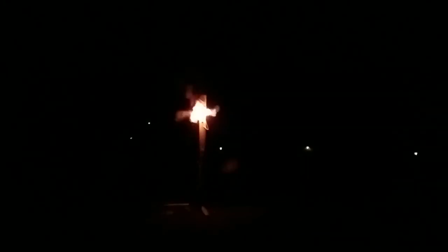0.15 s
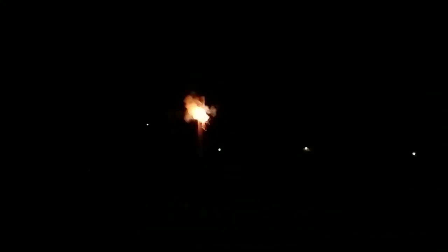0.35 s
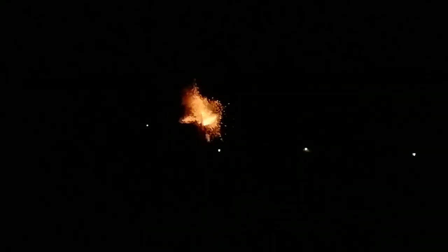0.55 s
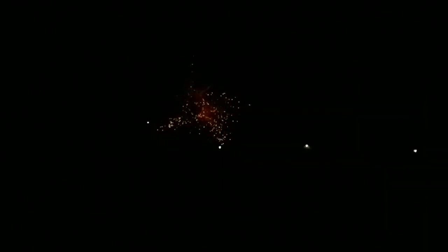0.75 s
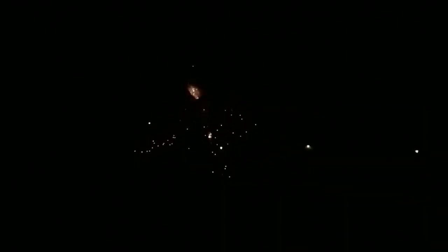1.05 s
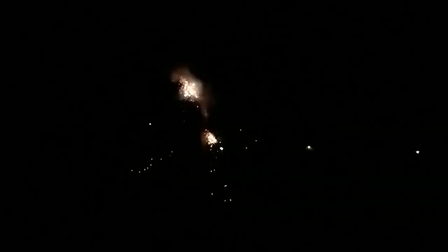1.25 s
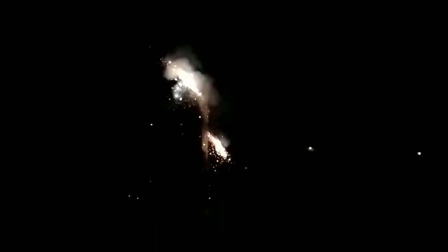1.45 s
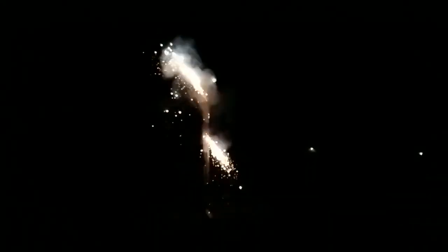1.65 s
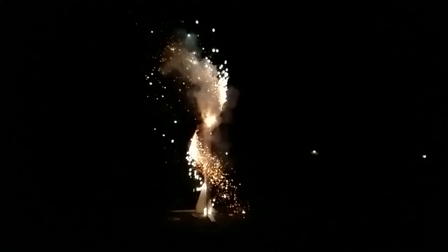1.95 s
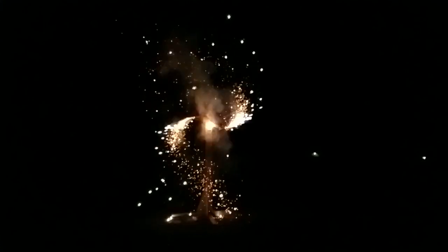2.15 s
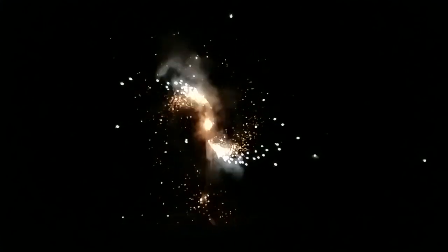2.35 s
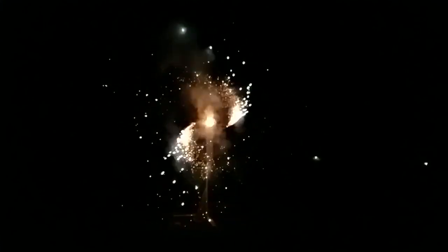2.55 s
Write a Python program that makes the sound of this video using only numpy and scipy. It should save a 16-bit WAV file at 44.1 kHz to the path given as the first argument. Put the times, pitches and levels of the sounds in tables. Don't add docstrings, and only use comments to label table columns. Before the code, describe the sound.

A firework wheel some metres away on an open lawn. Its fuse spits at once and sputters weakly, then flares at 0.5 s with a hissing burst and sharp pop at 0.54 s, dying by 0.7 s. Wind thumps the phone microphone around 0.9-1.3 s. Jet hiss grows from 1.2 s, peaks around 1.75-2 s, then rushes on slightly softer, grainy and shifting in colour as it spins.

```python
import sys
import numpy as np
from scipy import signal
from scipy.fft import rfft, irfft
from scipy.io import wavfile
from scipy.ndimage import uniform_filter1d, map_coordinates

SR = 44100
rng = np.random.default_rng(int(sys.argv[2]) if len(sys.argv) > 2 else 0)


def invert_db(level):
    return 10 ** (np.asarray(level, dtype=float) / 20)


def dump_mix(stems):
    frames = np.atleast_2d(stems).T
    limited = np.clip(frames, -1, 1)
    pcm = np.round(limited * 32767).astype(np.int16)
    wavfile.write(sys.argv[1], SR, pcm)


N = 119070
T = np.arange(N) / SR
HZ = np.arange(N // 2 + 1) * SR / N + 1

# (time [s], level [dB], nozzle ring [0-1], low roar share [dB],
# first jet over second [dB], casing ring [0-1])
THRUST = [(1.0, -63.5, 0.7, -2, 7, 0), (1.3, -42, 0.1, -12.5, 3.5, 0.02), (1.55, -32.5, 0.36, -14, -3, 0),
          (1.73, -22.5, 0.54, -15.5, -3.5, 0.1), (1.8, -23.5, 0.27, -10.5, 0, 0),
          (1.87, -24, 0.03, -6.5, 0.5, 0.02), (1.96, -22.5, 0, -6.5, -1.5, 0.28),
          (2.07, -24.5, 0.03, -9, -4.5, 0.1), (2.2, -27.5, 0.15, -9, -6.5, 0),
          (2.33, -29, 0.01, -8.5, 1, 0.05), (2.43, -27, 0.17, -7, 6, 0), (2.56, -28, 0, -9, 2, 0.04),
          (2.7, -29, 0, -7.5, -3.5, 0)]
# (time [s], angle from upright [rad])
WHEEL_ANGLE = [
    (1.7, 0),
    (1.9, .5),
    (2.05, 1.0),
    (2.2, 1.65),
    (2.43, 3.14),
    (2.7, 5.3),
]
# (frequency [Hz], level [dB])
JET_HISS = [(200, -14), (600, -9), (1330, -1), (1600, -5.5), (2750, 0.5), (5200, -4), (9500, -11),
            (14000, -11)]
# (frequency [Hz], level [dB])
NOZZLE_TONE = [(1500, 1), (2800, -5.5), (4000, -1), (5200, 1.5), (7800, -6), (11000, -16)]
# (frequency [Hz], level [dB])
ROAR = [(150, -5.5), (350, -3.5), (600, 6.5), (1000, -4), (2200, -4.5), (5000, -62)]
# (time [s], level [dB], low roar share [dB])
FUSE = [
    (0, -46.5, -5),
    (.018, -31.5, -6),
    (.07, -36.5, -3.5),
    (.25, -40.5, 0),
    (.36, -43, 4.5),
    (.42, -36, -4),
    (.49, -30.5, -8),
]
# (time [s], level [dB], low roar share [dB])
FLARE = [
    (.498, -27, -3),
    (.515, -20.5, -4),
    (.536, -19.5, -6),
    (.548, -21.5, -12.5),
    (.58, -22, -2),
    (.605, -26, -18),
    (.68, -44.5, -3),
    (.86, -56.5, 0),
    (1.1, -75, 0),
]
# (frequency [Hz], level [dB])
FUSE_HISS = [(150, -18), (250, -23), (430, -3.5), (1050, -13), (1900, 1), (3900, -7.5), (9600, -13.5),
             (14000, -13)]
# (time [s], peak level [dB], width [ms])
POPS = [
    (.4985, -15, .3),
    (.5389, 0, .28),
    (.5415, -8.5, .25),
    (.5431, -9, .4),
    (.5485, -18, .15),
    (.5765, -17, .35),
    (.582, -18, .2),
]
# (frequency [Hz], level [dB])
NIGHT = [(30, -27), (100, -7.5), (600, -7), (1300, -12.5), (3000, -18.5), (8000, -20), (14000, -30)]
# (frequency [Hz], level [dB])
LEFT_LEAN = [(60, -2), (110, -7), (200, 2.5), (380, -1), (700, 1), (1290, -1.5), (2380, -2.0), (4400, 0.5),
             (8120, 7), (15000, 6)]
# (frequency [Hz], phase [rad])
LEFT_AHEAD = [(100, .1), (1400, .3), (3800, 1.4), (5100, .5), (6500, 1.7), (7300, .4), (11000, 1.9),
              (13300, .4)]
# (frequency [Hz], level [dB])
UNLIKE = [(60, -13), (400, -12), (1400, -8.5), (3000, -6.5), (4400, -2), (7800, -5), (10500, -2),
          (13500, -5.5)]
# (time [s], level [dB])
GUST = [(0, -66), (.44, -61), (.56, -55), (.68, -70), (.8, -63), (.9, -43), (1.04, -52), (1.3, -45),
        (1.45, -46), (1.6, -48.5), (1.8, -40), (1.93, -53), (2.05, -42), (2.2, -47), (2.33, -40.5),
        (2.5, -49.5), (2.7, -45)]
# (frequency [Hz], level [dB])
WIND = [(12, -47), (20, -44), (65, -3.5), (114, -1.5), (296, -14.5), (367, -33), (500, -21), (650, -67),
        (1100, -120)]
# (time [s], peak level [dB], frequency [Hz], sign)
BUFFETS = [(0.851, -40, 79.5, 1), (0.89, -26, 92, 1), (0.929, -33.5, 89, -1), (1.065, -40, 82, -1),
           (1.113, -27.5, 107, -1), (1.182, -40, 100, 1), (1.222, -26, 88, 1), (1.265, -30.5, 84.5, 1),
           (1.829, -33, 120, 1), (2.24, -32, 146, 1)]
# (frequency [Hz], width [Hz], level [dB])
BODY = [(4164, 400, -3.5), (6840, 1540, -2.5), (7610, 810, 3.5), (9850, 1300, -1.5), (13930, 3600, 6)]


def shape(points):
    p = np.array(points, float)
    return np.interp(np.log(HZ), np.log(p[:, 0]), p[:, 1])


def unit(x):
    return x / np.sqrt(np.mean(x ** 2))


def colour(x, points):
    return irfft(rfft(x) * invert_db(shape(points)), N)


def curve(table, col=1):
    p = np.array(table, float)
    return np.interp(T, p[:, 0], p[:, col])


def walk(rate):
    hold = int(SR / rate)
    steps = np.repeat(rng.standard_normal(N // 50), hold)[:N]
    quick = uniform_filter1d(uniform_filter1d(steps, hold), hold)
    return unit(quick - uniform_filter1d(quick, 5 * hold))


def late(x, ms):
    return np.array([map_coordinates(c, [(T - ms / 1000) * SR], order=3, mode="mirror") for c in x])


def jets():
    hub_echo_ms, rim_echo_ms, rim_depth_ms, casing_ms = 2.53, 0.42, 0.3, 1.55
    ring = np.clip(curve(THRUST, col=2), 0, 0.95)
    casing = np.clip(curve(THRUST, col=5), 0, 0.95)
    first = 1 / (1 + invert_db(-2 * curve(THRUST, col=4)))
    out = 0
    for offset, share in ((0, first), (np.pi, 1 - first)):
        angle = curve(WHEEL_ANGLE) + offset
        gas = burn(JET_HISS, curve(THRUST, col=3), sputter_db=1.14, patch_db=1.0, spark_db=1.4)
        gas = gas + ring * nozzle(gas) + casing * late(gas, casing_ms)
        gas = gas / np.sqrt(1 + ring ** 2 + casing ** 2)
        gas = late(gas * np.sqrt(share), rim_depth_ms * np.sin(angle))
        out = out + grounded(gas, hub_echo_ms + rim_echo_ms * np.cos(angle))
    build_up = np.clip((T - 0.8) / 0.44, 0, 1)
    return out * invert_db(curve(THRUST) - 1.5) * build_up


def nozzle(gas):
    delay_ms, phase_rad = 0.39, 0.56
    turn = np.exp(1j * (phase_rad - 2 * np.pi * HZ * delay_ms / 1000))
    return irfft(rfft(gas) * turn * invert_db(shape(NOZZLE_TONE)), N)


def burn(hiss_points, roar_db, sputter_db, patch_db, spark_db):
    sparks_per_s, spark_level_db = 340, -13.5
    gas = rng.standard_normal((2, N)) * invert_db(sputter_db * walk(70) + spark_db * walk(500))
    chance = rng.random((2, N))
    spark_size = invert_db(spark_level_db + 20 - 2.5 * np.log(chance[1] + 0.05))
    sparks = (chance[0] < sparks_per_s / SR) * spark_size
    spectrum = rfft(colour(gas + sparks * np.sign(gas), hiss_points))
    hiss = 0
    for hz in 100 * 2 ** np.arange(0, 7.6, 0.5):
        band = np.cos(np.pi * np.clip(np.log2(HZ / hz), -0.5, 0.5)) ** 2
        hiss = hiss + irfft(spectrum * band, N) * invert_db(patch_db * walk(24.88))
    roar = colour(rng.standard_normal((2, N)), ROAR) * invert_db(2.0 * walk(60))
    return unit(hiss) + invert_db(roar_db) * unit(roar)


def grounded(x, ms):
    soft = signal.sosfilt(signal.butter(1, 5000, fs=SR, output="sos"), x)
    return x + invert_db(-4.5) * late(soft, ms)


def fuse():
    burning = FUSE + FLARE
    gas = burn(FUSE_HISS, curve(burning, col=2), sputter_db=1.33, patch_db=0.5, spark_db=1.2)
    return grounded(gas * invert_db(curve(burning) - 4.0) * (T < 1.3), 2.53)


def pops():
    out = 0
    for s, db, ms in POPS:
        u = (T - s) / ms * 1000
        push = 0.65 * np.exp(-(2.2 * (u + 1)) ** 2)
        pull = np.exp(-(1.5 * (u - 1)) ** 2)
        out = out + invert_db(db) * (push - pull)
    return colour(out, [(80, -40), (350, -7.5), (400, -2.5)]) * np.array([[1], [0.1]])


def far_echoes(wheel):
    tail_db, tail_t60_s = -10, 0.23
    tail = unit(rng.standard_normal((2, N))) * invert_db(-60 * T / tail_t60_s) * (T > 0.01)
    tail = tail / np.sqrt(np.sum(tail[0] ** 2))
    return invert_db(tail_db) * irfft(rfft(wheel) * rfft(tail), N)


def night():
    return invert_db(-54.5) * unit(colour(rng.standard_normal((2, N)), NIGHT))


def wind():
    left_db, apart, cycles, snap = -1, 0.26, 0.65, 0.21
    rough = rng.standard_normal((2, N)) * invert_db(1.3 * walk(39.85))
    rumble = unit(colour(rough, WIND)) * invert_db(curve(GUST))
    mid, side = rumble[0], apart * rumble[1]
    for s, db, hz, sign in BUFFETS:
        u = (T - s) * hz
        thump = np.cos(2 * np.pi * u + 0.7)
        edge = snap * np.exp(-(2.0 * u) ** 2) * np.cos(2 * np.pi * 2.9 * u + 0.96)
        mid = mid + np.sign(sign) * invert_db(db) * np.exp(-(u / cycles) ** 2) * (thump + edge)
    return np.array([mid + side, mid - side]) * invert_db(np.array([[left_db], [-left_db]]) / 2)


def scene():
    wheel = fuse() + jets() + pops()
    air = wheel + far_echoes(wheel) + night()
    common = rfft(air[0])
    unlike = rfft(air[1]) * invert_db(shape(UNLIKE))
    lean = invert_db(shape(LEFT_LEAN) / 2) * np.exp(0.5j * shape(LEFT_AHEAD))
    ports = np.array([(common + unlike) * lean, (common - unlike) / lean])
    return irfft(ports, N) + wind()


def roll_off(x):
    return signal.sosfilt(signal.butter(12, 15760, fs=SR, output="sos"), x)


def record(dry):
    low_hz, top_hz = 47, 14530
    body_db = sum(db / (1 + ((HZ - hz) / width * 2) ** 2) for hz, width, db in BODY)
    microphone = (HZ < top_hz) / np.sqrt(1 + (low_hz / HZ) ** 4)
    return roll_off(irfft(rfft(dry) * invert_db(body_db) * microphone, N))


dry = scene()
out = record(dry)
dump_mix(out)
```